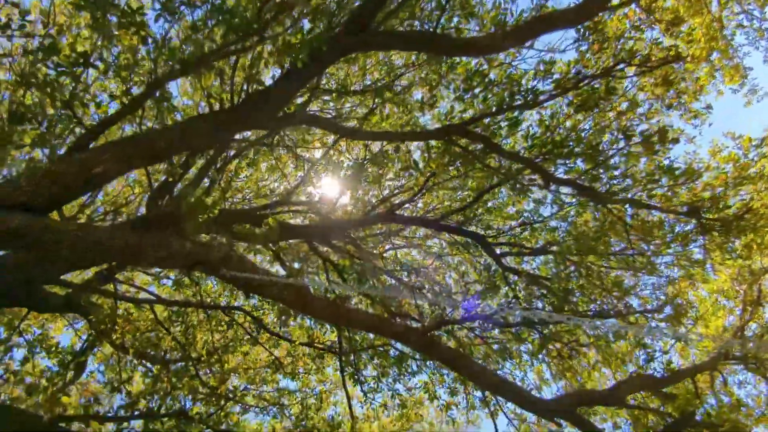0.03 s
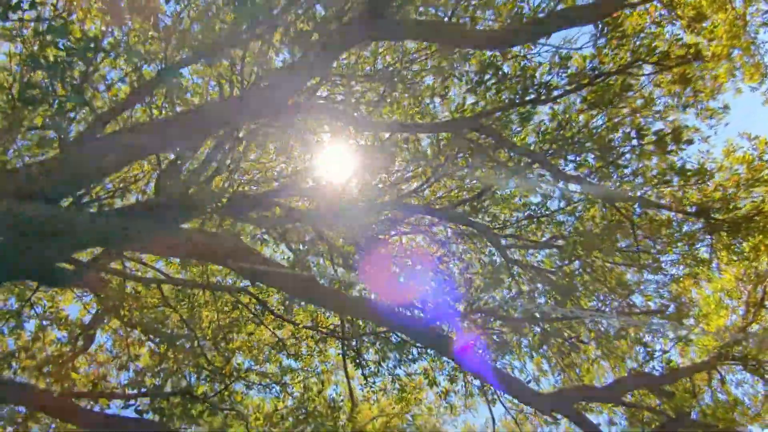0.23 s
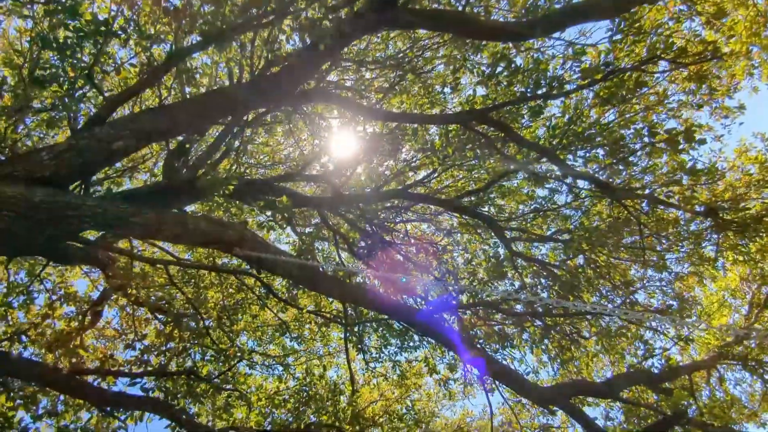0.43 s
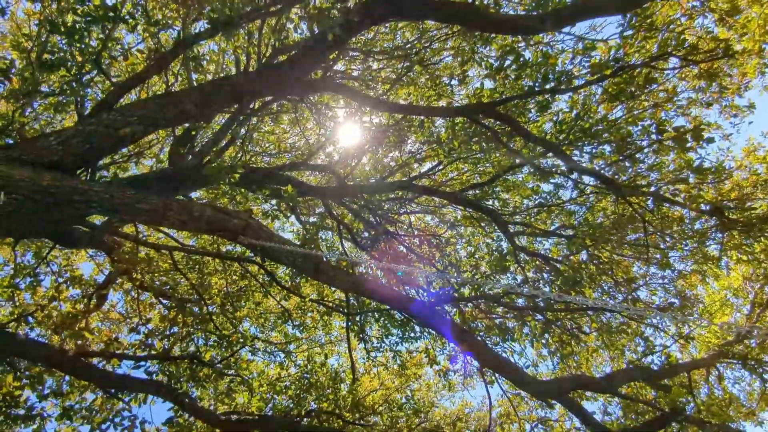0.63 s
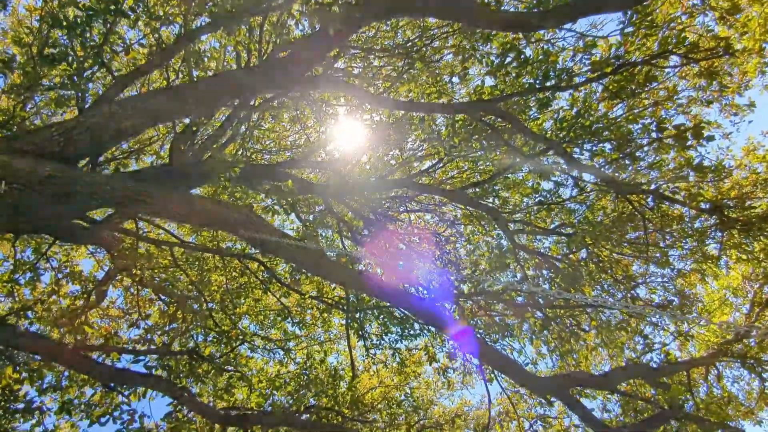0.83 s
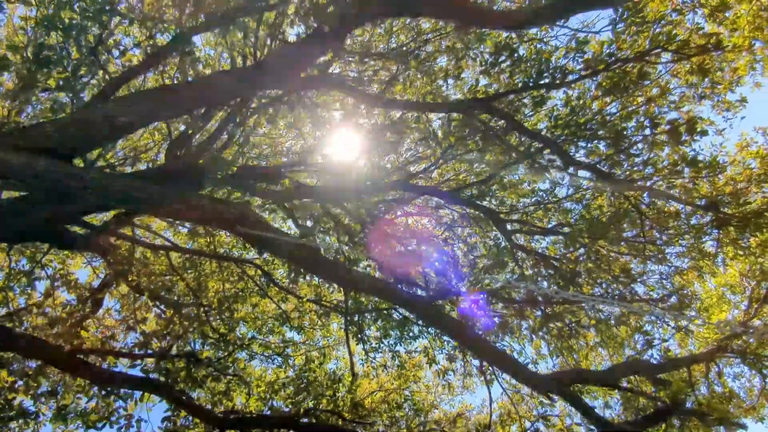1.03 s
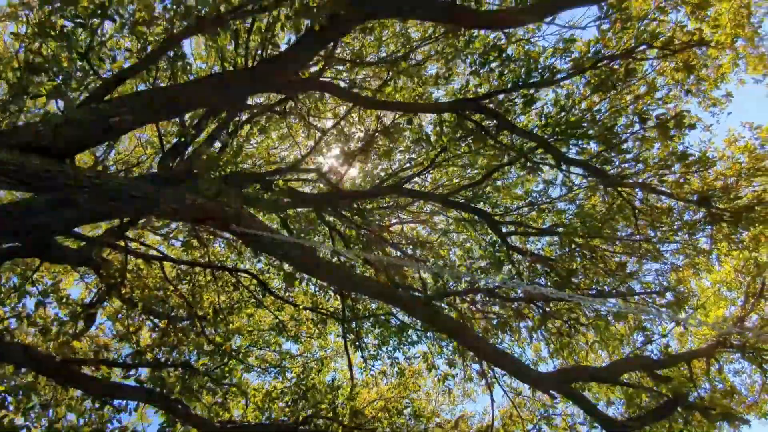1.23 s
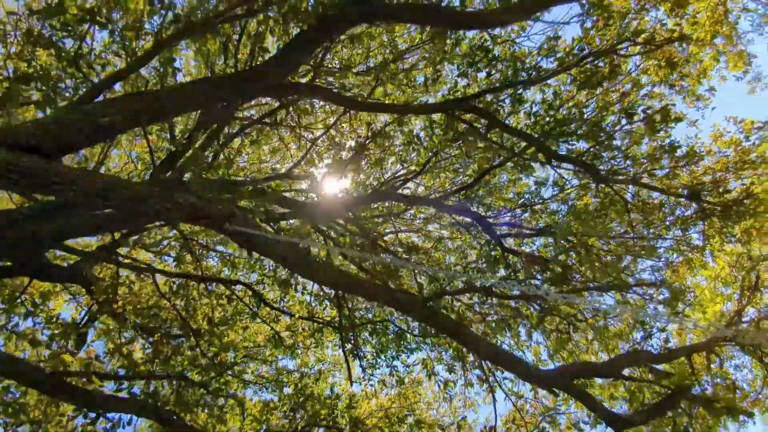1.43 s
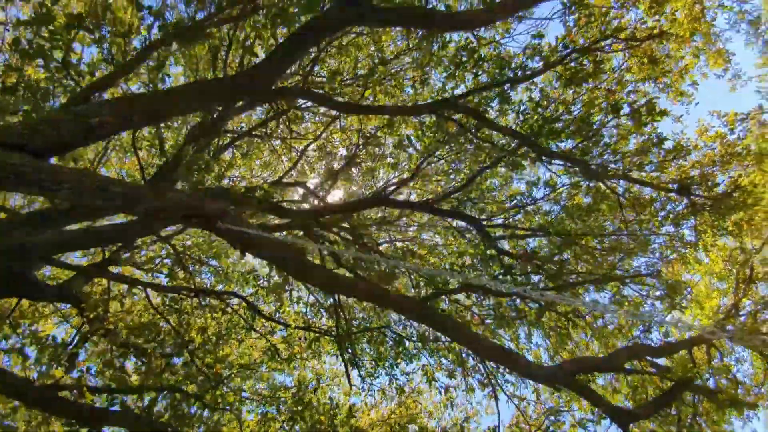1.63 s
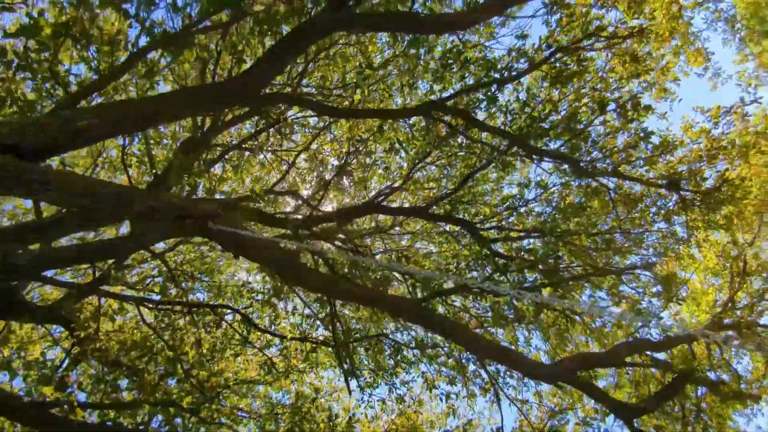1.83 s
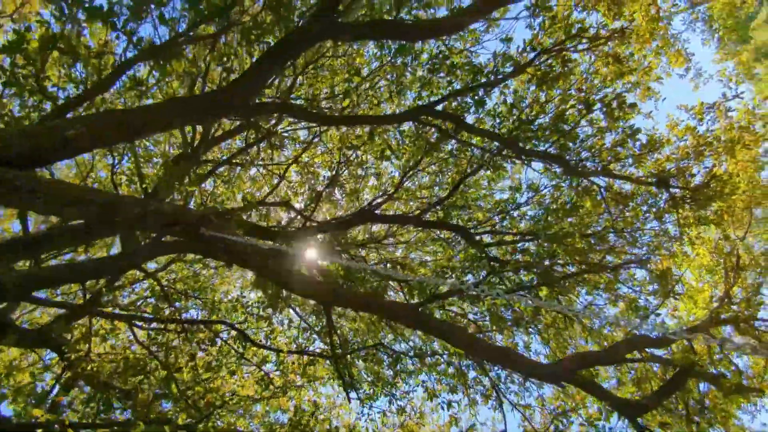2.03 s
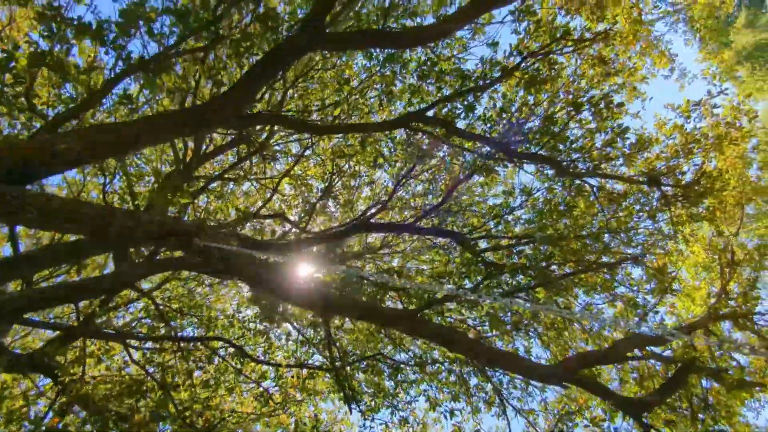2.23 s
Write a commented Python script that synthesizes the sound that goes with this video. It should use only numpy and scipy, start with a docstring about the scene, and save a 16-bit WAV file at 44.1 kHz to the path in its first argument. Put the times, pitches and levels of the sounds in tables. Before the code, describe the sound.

A swing rope gives one rough, stuttering creak on a tree limb, slowing to a last strong jerk; then sparse ticks, a low wind swell and two dry cracks, close up outdoors with quiet hiss.

```python
"""From the start, coloured noise makes the rumble and rush of air over an even hiss; a far bird peeps in falling chirps.
Fibres tick close by, as snaps and grainy rustles. From 0.2 to 0.5 s a swing rope creaks on the limb of a big tree:
stick-slip jerks, broadly growing stronger and further apart, run through the wood as falling chirps, ring it and
rasp the bark. Near 1 s the air swells as the swing passes, with low sine pulses as buffets on the microphone.
A faint steady tone rises and fades about 1.4 s, two dry cracks break in, and at 2.07 s the rope scrapes upward in pitch."""
import sys
import numpy as np
from scipy import signal
from scipy.fft import rfft, irfft
from scipy.io import wavfile
from scipy.ndimage import uniform_filter1d

SR = 44100
rng = np.random.default_rng(int(sys.argv[2]) if len(sys.argv) > 2 else 0)


def unload_audio(sound):
    """Save the sound as a 16-bit wav file, at the path given as the first command line argument."""
    columns = np.transpose(np.atleast_2d(sound))
    # keep every value between -1 and 1, then stretch to whole-number steps
    steps = np.round(np.clip(columns, -1, 1) * 32767)
    wavfile.write(sys.argv[1], SR, steps.astype(np.int16))


N = 101429

# Wind on the microphone: [t/s, rumble level/dB, flutter level/dB]
WIND_LEVELS = [(0, -62.5, -72), (0.199, -60.5, -68.5), (.5, -61, -64), (.68, -60.5, -72),
               (0.932, -49.5, -57), (1.07, -48, -68), (1.18, -56, -75), (1.498, -58.5, -76),
               (1.698, -68, -86), (1.802, -61.5, -66.5), (1.9, -62, -72), (2.221, -61, -61.5),
               (2.3, -66, -68)]
# Spectrum of the rumble: [f/Hz, relative level/dB per Hz]
RUMBLE_SPECTRUM = [(25, -32), (47, -2.5), (70, -2), (120, -3), (170, -9), (260, -42.5)]
# Spectrum of the flutter from smaller eddies: [f/Hz, relative level/dB per Hz]
FLUTTER_SPECTRUM = [(110, -17.5), (175, -0.5), (260, -6.5), (420, -18)]
RUMBLE_PAN_DB, WIND_WIDTH = 5, 0.7  # left-right difference; side over mid

# Air rushing past: [t/s, level/dB]
RUSH_LEVELS = [(0, -75.5), (.2, -74), (.65, -71.5), (.93, -63.5), (1.15, -72), (1.5, -80), (1.72, -84.5),
               (2.0, -78), (2.3, -73)]
# Spectrum of the rush: [f/Hz, relative level/dB per Hz]
RUSH_SPECTRUM = [(260, -17.5), (450, -1), (883, -1), (1080, -3), (2210, -16.5), (2710, -17.5), (8000, -40),
                 (10400, -33)]
RUSH_WIDTH = 0.76

# Spectrum of the even outdoor hiss: [f/Hz, relative level/dB per Hz]
HISS_SPECTRUM = [(290, -39), (500, -14), (1050, -3), (1570, -11), (3340, -11.5), (4280, -23.5), (6610, -21),
                 (7420, -27), (16000, -27.5)]
HISS_DB = -78.5

# Peeps of a far bird: [onset t/s, level/dB]
PEEPS = [(0.139, -76.5), (0.644, -73.5), (0.784, -73), (.931, -70.5), (1.069, -81), (1.186, -75),
         (1.638, -80), (1.747, -80)]
PEEP_START_HZ, PEEP_FALL_HZ_PER_S, PEEP_S = 2840, 20300, 0.025
PEEP_BLUR_PER_S = 380  # new random phases per second

# Ticks of the rope fibres: [t/s, snap level/dB, rustle level/dB]
TICKS = [(0.146, -52, -67), (0.184, -51, -55), (0.371, -42.5, -47), (.473, -47.5, -41.5), (0.525, -51, -37),
         (.546, -49, -37.5), (.747, -54.5, -48.5), (1.077, -52, -48), (1.104, -69, -46),
         (1.182, -54, -49.5), (1.192, -52, -46.5), (1.314, -69, -49), (1.383, -58, -45),
         (1.579, -48.5, -55), (1.712, -54, -52), (1.929, -66, -52.5), (2.067, -48, -48),
         (2.104, -46, -37.5)]
# Spectrum of the fibres: [f/Hz, relative level/dB per Hz]
FIBRE_SPECTRUM = [(1300, 1.5), (2200, -5), (3500, 1), (4200, -6.5), (6000, -3), (9100, -4.5), (11500, -2),
                  (16000, -7)]
SNAP_T60_S, RUSTLE_HOLD_S, RUSTLE_T60_S, TICK_PAN_DB = 0.011, 0.0098, 0.14, 3

# Slips of the rope: [t/s, relative level/dB]
SLIPS = [(.2076, -23), (.2174, -10.5), (.2302, -7.5), (.2450, -6.5), (.2574, -5), (.2702, -5.5),
         (.2847, -5.5), (.2979, -15), (.3092, -7), (.3209, -3), (.3320, -7), (.3461, -3), (.3613, -3.5),
         (.3853, -1), (.4012, -1.5), (.4247, -0.5), (.4969, 1)]
# Spectrum of one jerk: [f/Hz, relative level/dB]
JERK_SPECTRUM = [(200, -37), (480, -12), (760, 4.5), (980, -12), (1200, 3.5), (1450, 5), (1750, -4.5),
                 (2200, -22.5), (3000, -36), (3800, -34.5), (6000, -78)]
# Left-right balance of the creak: [f/Hz, level difference/dB]
CREAK_PAN = [(750, 2), (1300, -7.5), (2400, -9.5), (4400, 6)]
DULLING = 0.55  # weak slips are duller: extra dB per dB of slip level and octave
GRIP_DB, GRIP_HZ = 2.3, 900  # depth and period of the spectral ripple of a grip
BEND_S, BEND_HZ = 0.0056, 1384  # travel time of a bending wave of this frequency
# Modes of the limb: [f/Hz, relative level/dB, t60/s]
LIMB_MODES = [(356.7, -17, 0.28), (700, -1.5, 0.082), (791, -0.5, 0.17), (981, -20, 0.22),
              (1120, -16.5, 0.2), (1265, -13, 0.13), (1381, -7.5, 0.23), (1410, -6.5, 0.25),
              (1544, -12, 0.24), (1577, -9.5, 0.2), (1745, -6.5, 0.12), (1956, -16, 0.14),
              (2390, -17, 0.057), (2620, -20, 0.13), (3800, -29, 0.08)]
JERK_DB, LIMB_DB, LIMB_BUILD_S = -12, -15.5, 0.0011
# Spectrum of the dense ring of the tree: [f/Hz, relative level/dB per Hz]
RING_SPECTRUM = [(150, -57), (250, -27), (351, -28), (510, -16), (790, -1.5), (884, -9.5), (1020, -16.5),
                 (1370, -5), (1920, -15.5), (2120, -32), (2380, -18), (2980, -37), (3740, -24),
                 (4190, -46.5), (12000, -52.5)]
RING_DB, RING_T60_S, EARLY_DB, EARLY_T60_S, SCATTER_S = -20, 0.25, -20, 0.044, 0.0016
RING_WIDE_HZ = 2200  # the ring differs fully between left and right from here up

# Spectrum of the bark rasp: [f/Hz, relative level/dB per Hz]
RASP_SPECTRUM = [(2700, 0.5), (3800, -0.5), (4150, -8.5), (4900, 0), (5600, -24)]
RASP_DB, RASP_PAN_DB, RASP_T60_S = -41, 1, 0.055

# Buffets on the microphone: [peak t/s, f/Hz, level/dB, half-length/s, left-right difference/dB]
BUFFETS = [(.777, 98, -53, 0.0083, -12), (.956, 90, -39, 0.016, 7), (1.071, 70.6, -46, 0.026, 23),
           (1.302, 237, -45, 0.0041, -17), (1.309, 104, -46, 0.025, -7), (2.187, 179, -48.5, 0.01, -1)]

TONE_HZ, TONE_DB, TONE_AT_S, TONE_S = 461, -77.5, 1.4, 0.18

# Loud dry cracks: [t/s, snap level/dB, rustle level/dB, broad resonance f/Hz, resonance relative level/dB]
CRACKS = [(1.4172, -40.5, -39, 3070, -0.5), (2.084, -34, -30, 9300, 6.5)]
CRACK_S, CRACK_WIDTH_HZ = 0.001, 2000

SCRAPE_AT_S, SCRAPE_S, SCRAPE_DB, SCRAPE_PAN_DB = 2.072, 0.044, -64.5, -19.5
SCRAPE_START_HZ, SCRAPE_RISE_HZ_PER_S = 1568, 5570  # mean pitch, before jitter

TOP_HZ = 16000


def undb(db):
    """Logarithmic level law: decibels to amplitude gain."""
    return 10 ** (np.asarray(db) / 20)


def pan(db):
    """Interchannel level difference: left and right gains, split evenly about the centre."""
    return undb(np.array([[db], [-db]]) / 2)


def response(points):
    """Linear filtering: gain from (Hz, dB) points on a log-frequency axis, 24 dB per octave down outside."""
    hz, db = np.array(points).T
    octave = np.log2(np.maximum(np.fft.rfftfreq(N, 1 / SR), 1))
    knots = np.log2(hz)
    octaves_outside = abs(octave - np.clip(octave, knots.min(), knots.max()))
    return undb(np.interp(octave, knots, db) - 24 * octaves_outside)


def noise(points, width=1):
    """Spectral shaping of white noise: stereo of rms 1; width is side over mid before scaling."""
    mid, side = rfft(rng.standard_normal((2, N))) * response(points)
    both = irfft(np.array([mid + width * side, mid - width * side]), N)
    return both / both.std()


def fade(t, t60):
    """Exponential damping: 60 dB lost per t60 from time zero, silent before."""
    return (t >= 0) * undb(-60 * np.maximum(t, 0) / max(t60, 1e-3))


def unit(x):
    """Energy normalisation: sum of squares 1, averaged over channels."""
    return x / np.sqrt(np.mean(np.sum(x ** 2, axis=-1)))


def waver(t, rate):
    """Random modulation: straight lines between normal random values, rate of them per second."""
    return np.interp(t * rate, np.arange(N), rng.standard_normal(N))


def crackle():
    """Granular friction: many tiny fibre slips as a gain of rms 1."""
    grain = abs(uniform_filter1d(rng.exponential(size=N) ** 3, size=40)) ** .5
    return grain / np.sqrt(np.mean(grain ** 2))


def rustle(t, at):
    """Relaxation: strands settling after a snap hold, then decay."""
    return unit((t >= at) * fade(np.maximum(t - at - RUSTLE_HOLD_S, 0), RUSTLE_T60_S))


def wind(t):
    """Turbulent pressure: large eddies rumble on the microphone and smaller ones flutter."""
    times, rumble_db, flutter_db = np.array(WIND_LEVELS).T
    rumble = noise(RUMBLE_SPECTRUM, WIND_WIDTH) * undb(np.interp(t, times, rumble_db))
    flutter = noise(FLUTTER_SPECTRUM, WIND_WIDTH) * undb(np.interp(t, times, flutter_db))
    return rumble * pan(RUMBLE_PAN_DB) + flutter


def rush(t):
    """Flow noise: broadband air sound swells as the swing passes."""
    return noise(RUSH_SPECTRUM, RUSH_WIDTH) * undb(np.interp(t, *np.array(RUSH_LEVELS).T))


def hiss():
    """Stationary noise: the even outdoor hiss keeps one level and spectrum."""
    return undb(HISS_DB) * noise(HISS_SPECTRUM)


def bird(t):
    """Frequency sweep: falling peeps, their phase blurred by the leaves separately left and right."""
    blur = np.array([waver(t, PEEP_BLUR_PER_S), waver(t, PEEP_BLUR_PER_S)])
    out = 0
    for at, db in PEEPS:
        age = np.clip(t - at, 0, PEEP_S)
        swell = np.sin(np.pi * age / PEEP_S)
        cycles = (PEEP_START_HZ - PEEP_FALL_HZ_PER_S * age / 2) * age
        out = out + undb(db) * swell * np.sin(2 * np.pi * cycles + blur)
    return out


def fibres(t):
    """Impulsive release: strands snap over each other, each with a short grainy rustle after it."""
    snaps = sum(undb(db) * unit(fade(t - at, SNAP_T60_S)) for at, db, _ in TICKS)
    # overlapping rustles add in power
    settling = np.sqrt(sum((undb(db) * rustle(t, at)) ** 2 for at, _, db in TICKS))
    ticks = snaps * noise(FIBRE_SPECTRUM)
    rustles = settling * crackle() * noise(FIBRE_SPECTRUM)
    return (ticks + rustles) * pan(TICK_PAN_DB)


def slip_train(hz):
    """Stick-slip excitation: the spectrum of all jerks, each gripping at another spot."""
    octaves_up = np.clip(np.log2(hz / BEND_HZ), 0, 1.5)
    train = 0
    for at, db in SLIPS:
        grip = rng.uniform(0, 2 * np.pi)
        ripple_db = GRIP_DB * np.sin(2 * np.pi * hz / GRIP_HZ + grip)
        gain = undb(db * (1 + DULLING * octaves_up) + ripple_db)
        train = train + gain * np.exp(-2j * np.pi * hz * at)
    return train


def limb(t, hz):
    """Modal vibration and dispersion: a jerk and damped modes travel as a bending wave, highs first."""
    jerk = unit(irfft(response(JERK_SPECTRUM), N)) * undb(JERK_DB)
    modes = sum(undb(db) * np.cos(2 * np.pi * f * t) * fade(t, t60) for f, db, t60 in LIMB_MODES)
    build_up = (1 - np.exp(-t / LIMB_BUILD_S)) ** 2
    # delay falls as 1 / sqrt(f), counted from the arrival of BEND_HZ
    bend = np.exp(-2j * np.pi * BEND_S * (2 * np.sqrt(hz * BEND_HZ) - hz))
    return rfft(jerk + unit(modes * build_up) * undb(LIMB_DB)) * bend


def tree_ring(t, hz):
    """Diffuse decay: dense ringing as noise with a fast and a slow fall, wider at high frequencies."""
    late = undb(RING_DB) * unit(fade(t, RING_T60_S))
    early = undb(EARLY_DB) * unit(fade(t, EARLY_T60_S))
    onset = 1 - np.exp(-t / SCATTER_S)
    width = np.minimum(hz / RING_WIDE_HZ, 1) ** 2
    return rfft(noise(RING_SPECTRUM, width) * (late + early) * onset)


def creak(t):
    """Convolution: every slip excites the response of the limb and the tree."""
    hz = np.maximum(np.fft.rfftfreq(N, 1 / SR), 1)
    side_db = np.interp(hz, *np.array(CREAK_PAN).T)
    balance = undb(np.array([side_db, -side_db]) / 2)
    return irfft(slip_train(hz) * (limb(t, hz) + tree_ring(t, hz)) * balance, N)


def rasp(t):
    """Sliding friction: bark grates under the rope in a decaying noise burst at every slip."""
    bursts = np.sqrt(sum((undb(db) * unit(fade(t - at, RASP_T60_S))) ** 2 for at, db in SLIPS))
    return undb(RASP_DB) * bursts * noise(RASP_SPECTRUM) * pan(RASP_PAN_DB)


def buffets(t):
    """Pressure pulses: eddies thump the microphone as sines under Gaussian swells."""
    out = 0
    for at, hz, db, length, side_db in BUFFETS:
        age = t - at
        swell = np.exp(-(age / length) ** 2)
        out = out + undb(db) * pan(side_db) * swell * np.sin(2 * np.pi * hz * age)
    return out


def far_tone(t):
    """Amplitude and phase modulation: a faint far tone comes and goes with a wandering phase."""
    swell = np.exp(-((t - TONE_AT_S) / TONE_S) ** 2)
    return swell * undb(TONE_DB) * np.sin(2 * np.pi * TONE_HZ * t + .5 * waver(t, 40))


def cracks(t):
    """Collective release: a whole bundle of fibres goes at once, with a broad resonance and a rustle."""
    out = 0
    for at, snap_db, rustle_db, hz, body_db in CRACKS:
        burst = unit(np.exp(-((t - at - CRACK_S) / CRACK_S) ** 2))
        below, above = max(hz - CRACK_WIDTH_HZ, 500), hz + CRACK_WIDTH_HZ
        body = noise([(below, -7), (hz, 0), (above, -16)]) * pan(TICK_PAN_DB * hz / TOP_HZ * 2)
        strands = noise(FIBRE_SPECTRUM) * pan(TICK_PAN_DB)
        colour = (strands + undb(body_db) * body) / np.hypot(1, undb(body_db))
        envelope = undb(snap_db) * burst + undb(rustle_db) * rustle(t, at) * crackle()
        out = out + envelope * colour
    return out


def scrape(t):
    """Frictional chirp: a short, stuttering scrape with jittered pitch rises as the rope shifts."""
    age = np.clip(t - SCRAPE_AT_S, 0, SCRAPE_S)
    hz = (SCRAPE_START_HZ + SCRAPE_RISE_HZ_PER_S * age) * (1 + .13 * waver(t, 2500))
    envelope = waver(t, 350) * np.sin(np.pi * age / SCRAPE_S)  # stutter under a smooth swell
    tone = np.sin(2 * np.pi * np.cumsum(hz) / SR)
    return undb(SCRAPE_DB) * envelope * tone * pan(SCRAPE_PAN_DB)


def scene():
    """Superposition: all sources at the swing add linearly."""
    t = np.arange(N) / SR
    out = wind(t) + rush(t) + hiss() + bird(t) + fibres(t)
    out += creak(t) + rasp(t)
    return out + buffets(t) + far_tone(t) + cracks(t) + scrape(t)


def record(dry):
    """Band limiting: the recorder's steep elliptic low-pass cuts the top."""
    return signal.sosfilt(signal.ellip(8, .2, 70, TOP_HZ, fs=SR, output="sos"), dry)


dry = scene()
out = record(dry)
unload_audio(out)
```